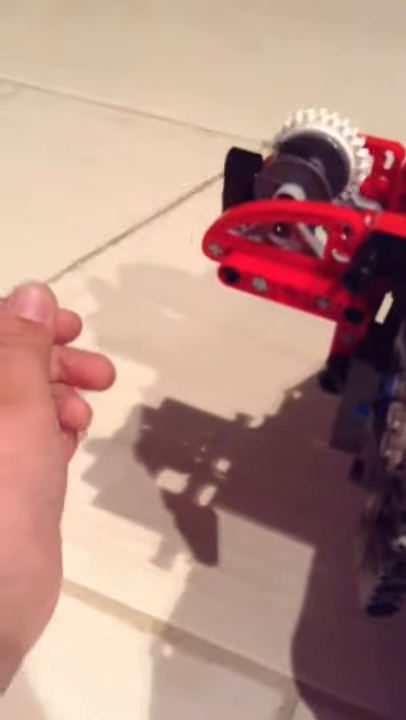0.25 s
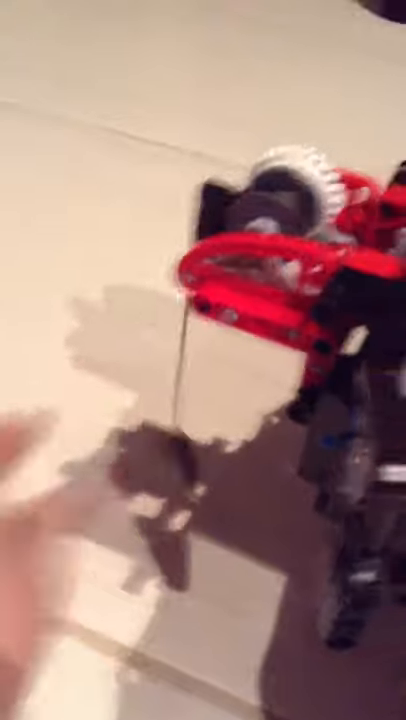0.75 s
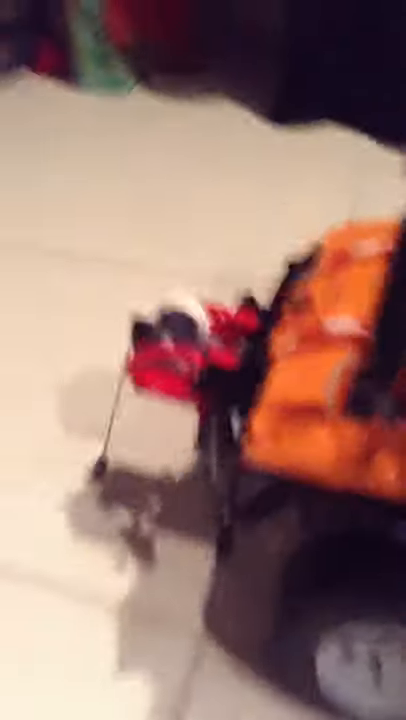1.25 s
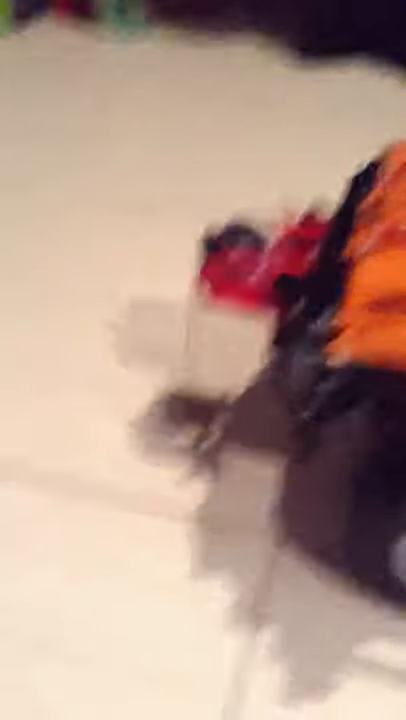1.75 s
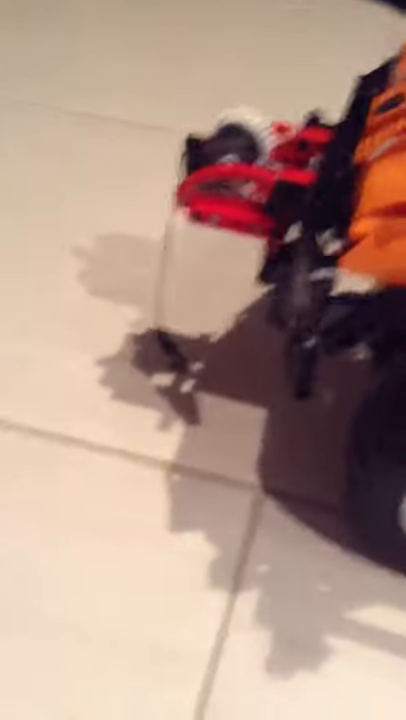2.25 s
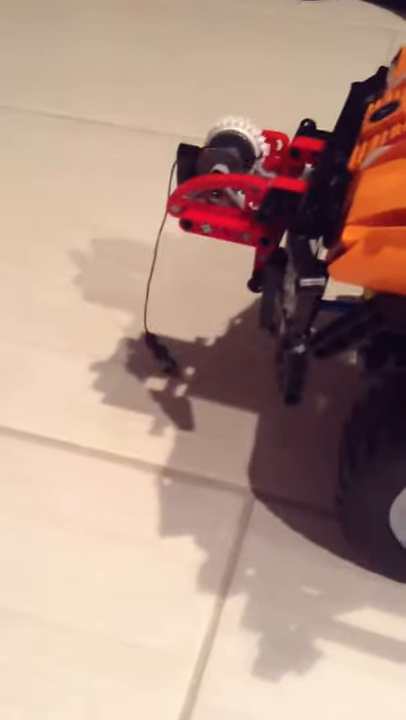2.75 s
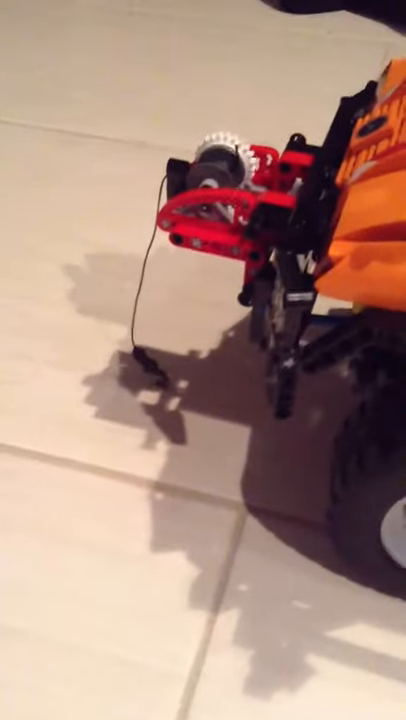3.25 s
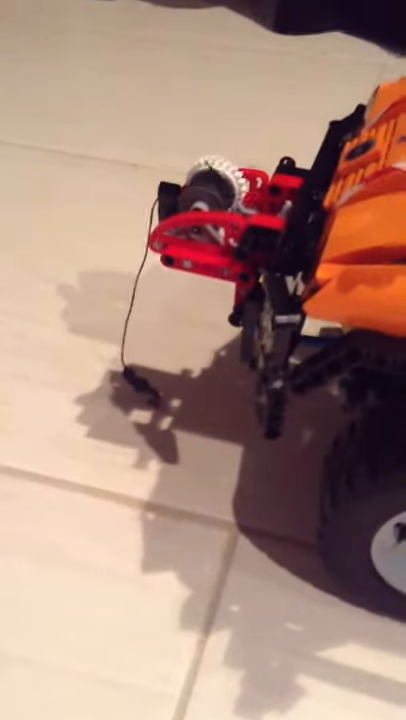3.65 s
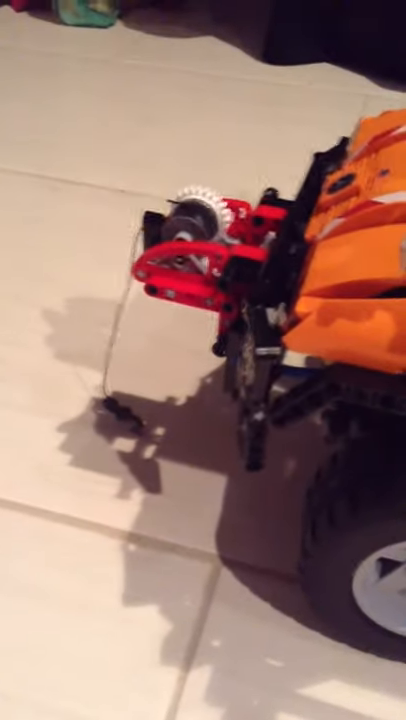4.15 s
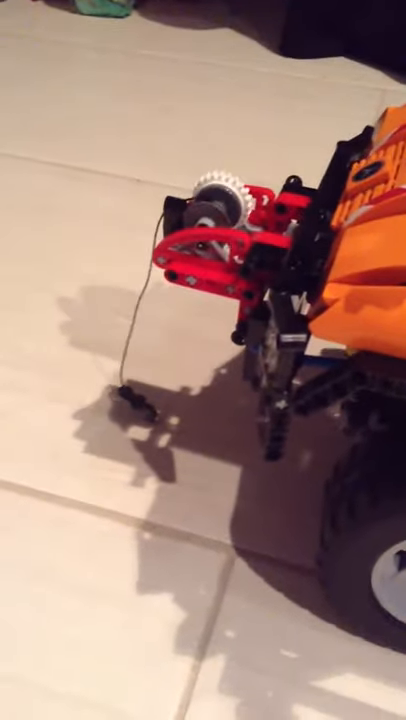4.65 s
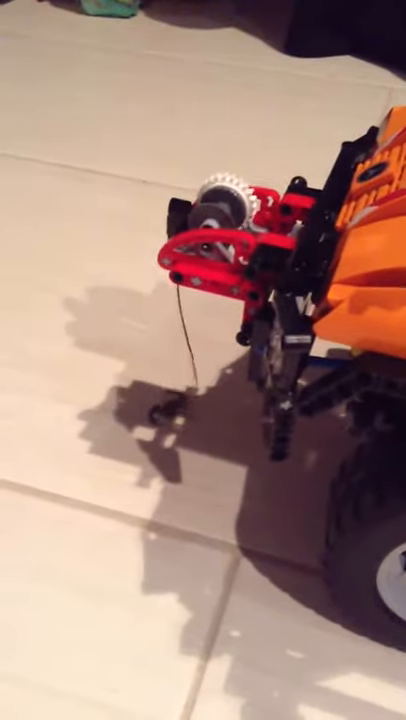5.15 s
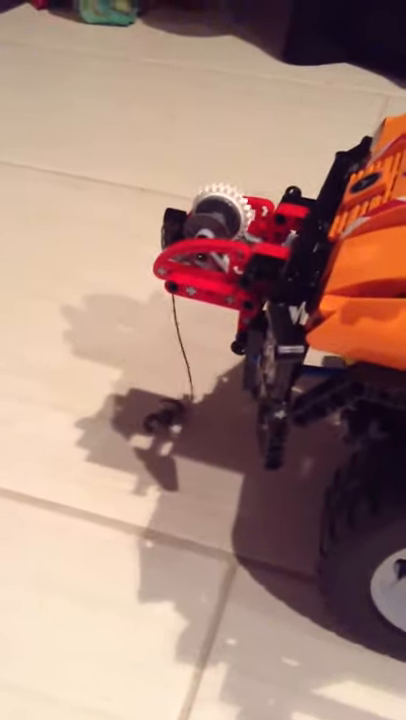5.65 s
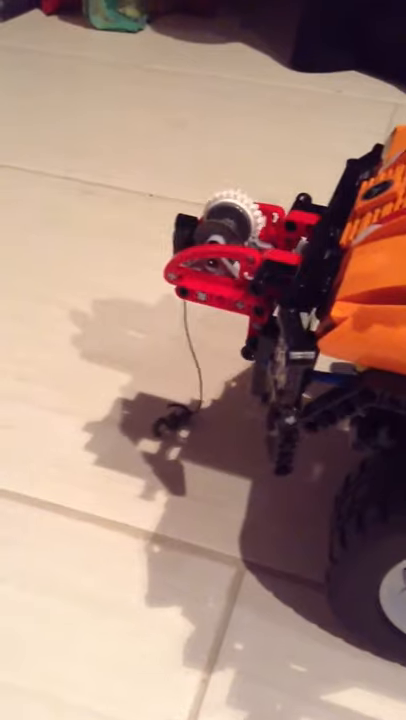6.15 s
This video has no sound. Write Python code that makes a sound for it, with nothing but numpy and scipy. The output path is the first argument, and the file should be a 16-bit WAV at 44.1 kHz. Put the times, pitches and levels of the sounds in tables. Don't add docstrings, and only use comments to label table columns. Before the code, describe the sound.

Steady whirring and grinding of a small motor turning plastic gears, treble-heavy with almost no bass. It begins already running, very close and harsh, peaks as the microphone faces the motor near one second, then drops a little and stays steady. Faint high gear whine, rapid fluttering pulses, small swells as teeth bind, and two barely audible handling bumps near two seconds. It ends still running.

```python
import sys
import numpy as np
from scipy import signal
from scipy.fft import rfft, irfft
from scipy.io import wavfile
from scipy.ndimage import uniform_filter1d

SR = 44100
rng = np.random.default_rng(int(sys.argv[2]) if len(sys.argv) > 2 else 0)


def linear_from_db(decibels):
    return 10 ** (np.asarray(decibels, float) / 20)


def wrap_up_sound(samples):
    columns = np.atleast_2d(samples).T
    tamed = np.clip(columns, -1, 1)
    steps = np.round(tamed * 32767).astype(np.int16)
    wavfile.write(sys.argv[1], SR, steps)


N = 281799

AXLE_HZ = 6.1556


def evened(x):
    return x / np.sqrt(np.mean(x ** 2) + 1e-20)


def wander(top_hz, low_hz=5):
    hz = np.fft.rfftfreq(N, 1 / SR)
    weight = (hz > low_hz) / np.sqrt(1 + (hz / top_hz) ** 2)
    return evened(irfft(rfft(rng.standard_normal(N)) * weight, N))


def phone():
    # t/s, closeness (1 is close, below 0 is far), facing the motor case (0-1)
    phone_path = [
        (0, 1., 0.),
        (.85, 1., 0),
        (1.02, 1., 1),
        (1.22, .85, 0.85),
        (1.4, .1, .45),
        (1.7, -.35, .1),
        (2.1, -.3, 0.1),
        (2.3, 0., 0.01),
        (6.39, .1, 0.2),
    ]
    s, close, faced = np.transpose(phone_path)
    t = np.arange(N) / SR
    return np.interp(t, s, close), np.interp(t, s, faced)


def nearness():
    # t/s, share of the close colour (0-1)
    near_path = [(0, 0.78), (.5, 0.7), (.9, 0.8), (1.1, 0), (1.28, 0.15), (1.38, .2), (1.6, 0.17),
                 (2.2, 0.14), (6.39, 0.01)]
    return np.clip(np.interp(np.arange(N) / SR, *np.transpose(near_path)), 0, 1)


def snags():
    # t/s, swell/dB
    snag_times = [(.07, 0.5), (.23, 3.5), (.34, 2), (.55, 2.5), (.72, 1), (1.02, 2.5), (1.19, 5),
                  (1.31, 2.5), (1.48, 3), (2.18, 0), (2.35, 2), (2.53, 1), (2.67, 1.5), (3.1, 2), (3.32, 1),
                  (3.82, 3.5), (4.29, 1.5), (4.61, 4), (4.78, -0.5), (4.94, 2.), (5.083, 6.5), (5.27, 1.5),
                  (5.425, 1.5), (5.6, 1), (5.75, 3.5), (5.93, 3), (6.24, 2.), (6.385, 4.)]
    flare_s, slack_s, slack = 0.018, 0.13, 0.34
    t = np.arange(0, N + 64, 64) / SR
    away = t - np.array(snag_times)[:, :1]
    flare = np.exp(-(away / flare_s) ** 2 / 2)
    relief = np.exp(-(away / slack_s) ** 2 / 2)
    shape = (1 + slack) * flare - slack * relief
    return np.interp(np.arange(N) / SR, t, np.array(snag_times)[:, 1] @ shape)


def bumps():
    # t/s, level/dB, f/Hz, time to fade by 60 dB/s
    finger_bumps = [
        (2.255, -47, 190, 0.053),
        (1.87, -48, 460, 0.07),
    ]
    out, t = np.zeros(N), np.arange(6000) / SR
    for s, db, hz, t60 in finger_bumps:
        rings = np.sin(2 * np.pi * hz * t) + 1.1 * np.sin(2 * np.pi * 1.26 * hz * t)
        soft_start = 1 - np.exp(-(t / 0.0027) ** 2)
        out[round(s * SR):][:len(t)] += linear_from_db(db - 60 * t / t60) * soft_start * rings
    bass_cut = signal.butter(4, 125, "high", fs=SR, output="sos")
    return signal.sosfilt(bass_cut, out)


def tone(hz, db, waver_hz, flutter_db=3.5):
    turns = np.cumsum(hz + waver_hz * wander(7, 1.5)) / SR
    return np.sqrt(2) * linear_from_db(db + flutter_db * wander(9.4)) * np.sin(2 * np.pi * turns)


def whines():
    # starting f/Hz, close level/dB, far level/dB, extra when faced/dB, waver/Hz
    shaft_tones = [
        (894, -58.5, -73, -3, 1),
        (1927, -64, -55.5, -5, 3),
        (2536, -61, -59.5, 1, 7),
        (2231, -59, -60, 0, 3),
    ]
    drum_hz, drum_crest = 2.3084, .12
    drum_swing, sag_per_s = .0045, .0011
    t = np.arange(N) / SR
    near = nearness()
    close, faced = phone()
    speed = 1 - sag_per_s * t + drum_swing * np.cos(2 * np.pi * (drum_hz * t - drum_crest))
    planet_gear_db = -53 - 4 * close + 11 * faced
    out = tone(2640 * speed, planet_gear_db, waver_hz=3.3, flutter_db=2.5)
    for hz, close_db, back_db, faced_db, waver_hz in shaft_tones:
        level_db = near * close_db + (1 - near) * back_db + faced * faced_db
        out += tone(hz * speed, level_db, waver_hz)
    return out


def colour_db(hz, broad, column):
    # f/Hz, width/Hz,
    # close height/dB, far height/dB
    colour_peaks = [(149.7, 6.1, 8, 11.5), (204, 12, 9, 12.5), (441, 7.7, 9.5, 5), (575.7, 24, 3, 7),
                    (771, 27, 8.5, 2), (900, 9.6, -2, 0), (1256, 16, 6, 4.5), (1490, 54, -1, 1.5),
                    (1921, 25, 5, 4.5), (2090, 6.3, -8, 7.5), (2237, 24, -5, 1), (2542, 65, 3, 6),
                    (2650, 31, 0, 0), (3027, 82, -1, 2.5), (3620, 150, -5, 3.5), (3870, 46, -3, 2.5),
                    (3960, 220, 6, 0), (4470, 78, 3.5, 2), (5740, 63, -8, 1.5), (6300, 1300, 5.5, -5),
                    (7270, 680, 4, 2.5), (8170, 350, 6, -4.5), (8750, 240, -9, 2), (9470, 310, -0.5, -1),
                    (9950, 320, -0.5, -4), (10700, 250, -2, -8), (11500, 200, 4.5, 1.5), (12700, 460, 3, 3.5),
                    (13500, 300, 3, -1), (13950, 200, -3, 1), (14600, 400, 7, -2)]
    f, db = np.transpose(broad)
    rings = sum(linear_from_db(2 * r[column]) / (1 + (2 * (hz - r[0]) / r[1]) ** 2) for r in colour_peaks)
    return np.interp(np.log(hz + 1), np.log(f + 1), db) + 10 * np.log10(1 + rings)


def causal(gain_db):
    log_gain = np.log(linear_from_db(np.maximum(gain_db, gain_db.max() - 100)))
    circle = np.r_[log_gain, log_gain[-2:0:-1]]
    taps = np.fft.ifft(np.exp(np.conj(signal.hilbert(circle)))).real
    return taps / np.linalg.norm(taps)


def clacks(per_turn, place, fade_s=0.0016, spread=0.78):
    turns = np.floor(per_turn * AXLE_HZ * np.arange(N + 1) / SR - place)
    train = np.diff(turns) * rng.exponential(1, N) ** spread
    power = signal.lfilter([1], [1, -np.exp(-1 / (fade_s * SR))], train)
    return evened(power - power.mean())


def part_levels_db():
    # steady level/dB, extra when close/dB, extra when faced/dB, share of each snag (0-1)
    part_levels = [
        (-49, 0.7, 0.4, 0.06),
        (-43, 0.96, 1.5, 0.1),
        (-37.5, 1.86, 2.5, 0.77),
        (-35.5, 1.88, 0.7, 0.12),
    ]
    return np.array(part_levels) @ np.array([np.ones(N), *phone(), snags()])


def winch():
    throbs = np.array([(1, .38, .03, .08, .12, .04), (2, .1, .16, .14, .1, .07),
                       (3, .28, .1, .05, .12, .04), (4, .34, .13, .04, .04, .04),
                       (6, .63, .1, .08, .07, .06), (16, .77, .02, .03, .06, .04),
                       (4.909, .47, .02, .12, .05, .02), (9.819, .75, .02, .12, .06, .02),
                       (14.728, .14, .02, .15, .06, .02), (24.097, .29, .02, .03, .05, .01),
                       (13.191, .9, .01, .04, .05, .07)])
    clack_teeth = np.array([
        (16, .7, .02, .04, .08, .03),
        (24.097, .2, .02, .04, .09, .01),
    ])
    # share of the common unevenness/dB, size spread of single knocks/dB
    grind = [
        (0.32, -0.6),
        (0.04, 1.4),
        (0.63, 1.5),
        (0.44, 1.47),
    ]
    part_borders = [0, 1800, 3200, 5000, 30000]
    # f/Hz, level per Hz/dB
    close_colour = [(18, -94), (30, -72), (201, -35), (406, -25.5), (570, -14.5), (843, -17.5), (911, -7),
                    (1090, -16), (1250, -8), (2210, -12.5), (3350, -10.5), (4350, -4), (6110, 1),
                    (9030, -4), (15200, -10)]
    # f/Hz, level per Hz/dB
    back_colour = [(18, -88), (30, -74), (475, -25.5), (570, -19), (843, -17), (1890, -8), (2330, -10),
                   (2580, -8), (3180, -8.5), (3920, -2), (4830, -4), (5800, -4), (10800, -14),
                   (13000, -12.5), (15200, -14.5)]
    t, hz = np.arange(N) / SR, np.fft.rfftfreq(16384, 1 / SR)
    lead = 8192
    near = nearness()
    colours = [colour_db(hz, close_colour, column=2), colour_db(hz, back_colour, column=3)]
    levels_db = part_levels_db()
    beats = np.array([np.cos(2 * np.pi * (k * AXLE_HZ * t - crest)) for k, crest, *_ in throbs])
    teeth = np.array([clacks(*row[:2]) for row in clack_teeth])
    teeth = teeth * (1 + 0.65 * np.maximum(snags(), 0))
    uneven, out = wander(24), np.zeros(N)
    for k, (uneven_db, spread_db) in enumerate(grind):
        throb = 1.07 * throbs[:, 2 + k] @ beats
        clack = 2.2 * clack_teeth[:, 2 + k] @ teeth
        power = np.maximum(1 + throb + clack, .05)
        sizes = uniform_filter1d(rng.exponential(1, N), size=1 + 40 // (k + 1))
        knocks = rng.standard_normal(N + lead)
        knocks[lead:] *= np.sqrt(power) * linear_from_db(uneven_db * uneven + spread_db * evened(sizes - 1))
        below_top = 1 / (1 + (hz / part_borders[k + 1]) ** 24)
        below_bottom = 1 / (1 + ((hz + 1) / (part_borders[k] + 1e-3)) ** 24)
        share_db = 10 * np.log10(np.maximum(below_top - below_bottom, 1e-12))
        close, back = (signal.oaconvolve(knocks, causal(c + share_db))[lead:][:N] for c in colours)
        out += linear_from_db(levels_db[k]) * evened(near * evened(close) + (1 - near) * evened(back))
    return out


def scene():
    return np.tile(bumps() + whines() + winch(), (2, 1))


def dropouts(x):
    hz, _, z = signal.stft(x, SR, nperseg=2048, noverlap=1536)
    power = abs(z) ** 2 + 1e-20
    local = uniform_filter1d(uniform_filter1d(power, size=7, axis=0), size=4, axis=1)
    around = uniform_filter1d(uniform_filter1d(power, size=81, axis=0), size=9, axis=1)
    limit_db = np.interp(hz, [4000, 6000, 9500, 13500, 15000], [-80., -6.5, -3.6, -2.7, -2.4])[:, None]
    keep = np.clip((10 * np.log10(local / around) - limit_db) / .3, .02, 1)
    return signal.istft(z * keep, SR, nperseg=2048, noverlap=1536)[1][:N]


def splits():
    # t/s, lowest f/Hz, highest f/Hz, level/dB
    noise_puffs = [(.527, 4600, 5700, -40), (.806, 5650, 6900, -43), (1.361, 4170, 6300, -40),
                   (2.059, 5600, 6840, -44), (2.059, 8900, 10300, -51), (2.128, 4200, 5180, -43),
                   (2.128, 8900, 10300, -49), (2.151, 7600, 9000, -47), (3.036, 4130, 5740, -42),
                   (4.567, 4650, 6800, -37)]
    out, hz = np.zeros(N), np.fft.rfftfreq(2048, 1 / SR)
    noise = rng.standard_normal((len(noise_puffs), 2048))
    for (s, low_hz, high_hz, db), row in zip(noise_puffs, noise):
        band = irfft(rfft(row) * (hz > low_hz) * (hz < high_hz))
        puff = evened(band) * signal.windows.cosine(2048) ** 3
        out[round(s * SR) - 1024:][:2048] += linear_from_db(db) * puff
    return out


def roll_off(x):
    return signal.sosfilt(signal.butter(12, 15420, fs=SR, output="sos"), x)


def record(dry):
    treble_cut = signal.firwin(1535, 15285, window=("kaiser", 12), fs=SR)
    bass_cut = signal.butter(2, 70, "high", fs=SR, output="sos")
    x = signal.oaconvolve(dropouts(dry[0]), treble_cut, "same")
    x = signal.sosfilt(bass_cut, x)
    return roll_off(x + splits() * np.array([[1], [-1]]))


dry = scene()
out = record(dry)
wrap_up_sound(out)
```